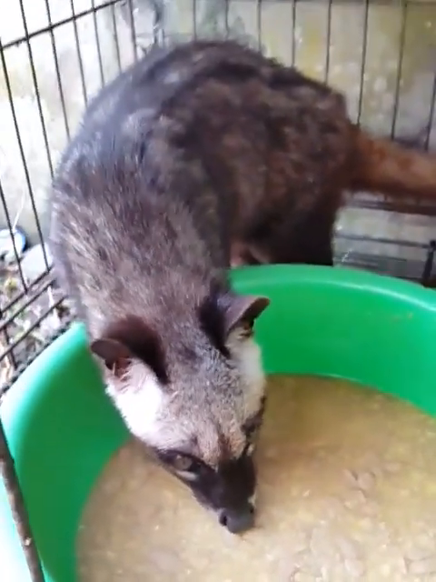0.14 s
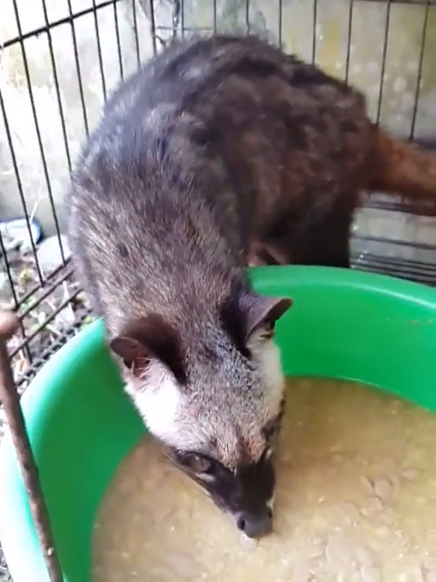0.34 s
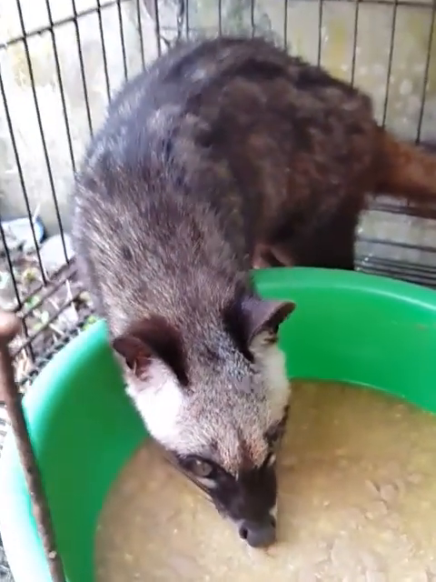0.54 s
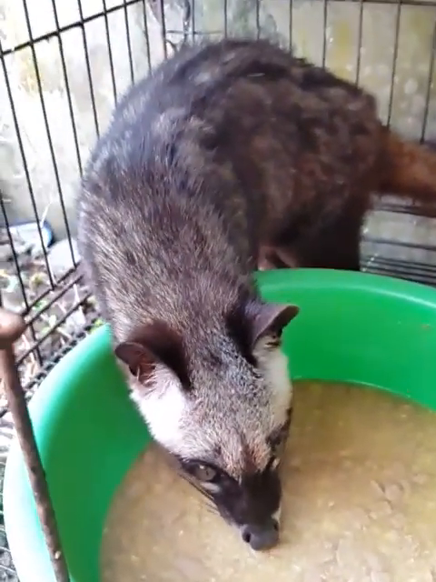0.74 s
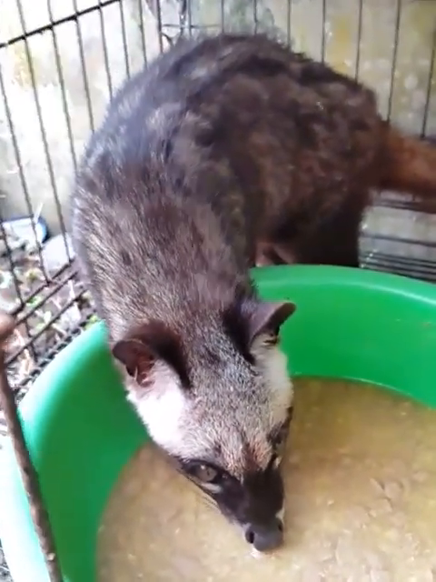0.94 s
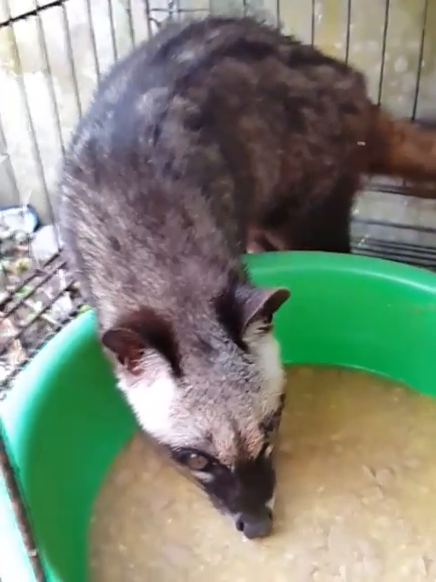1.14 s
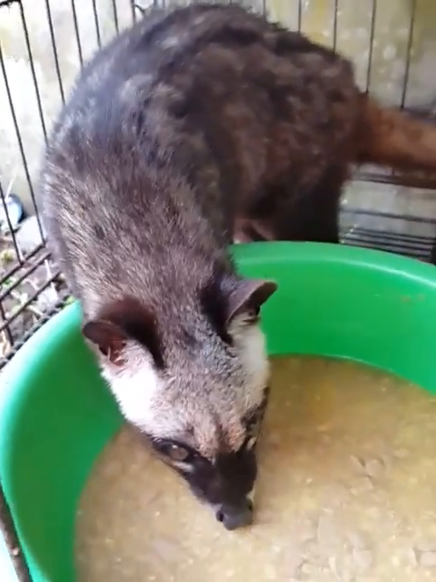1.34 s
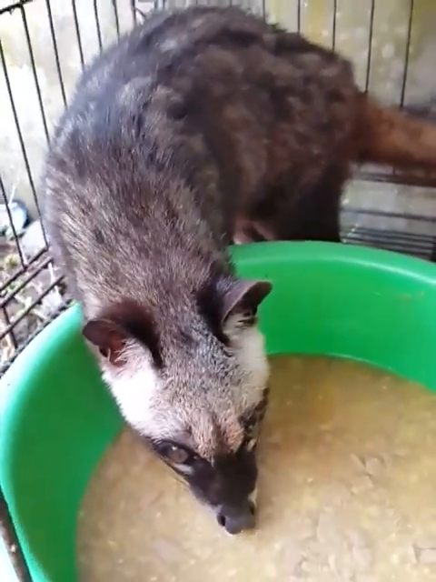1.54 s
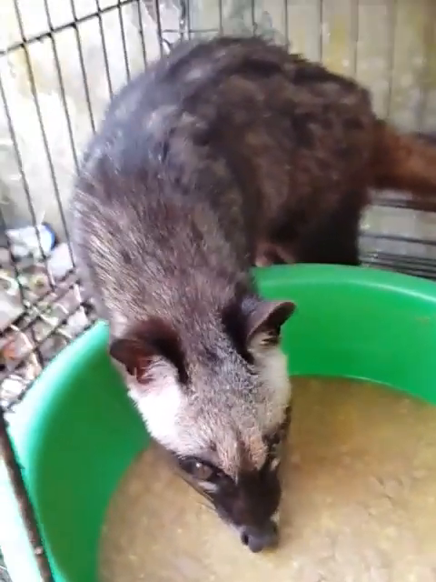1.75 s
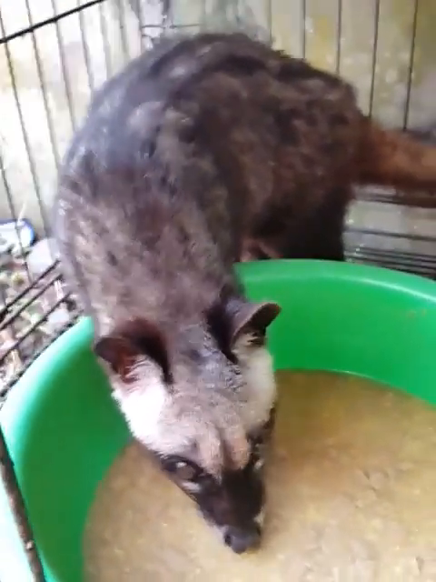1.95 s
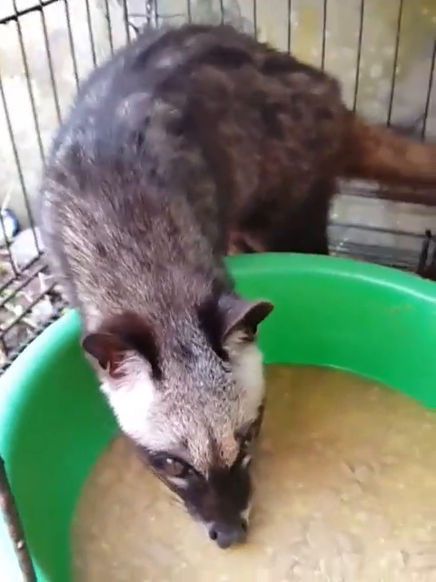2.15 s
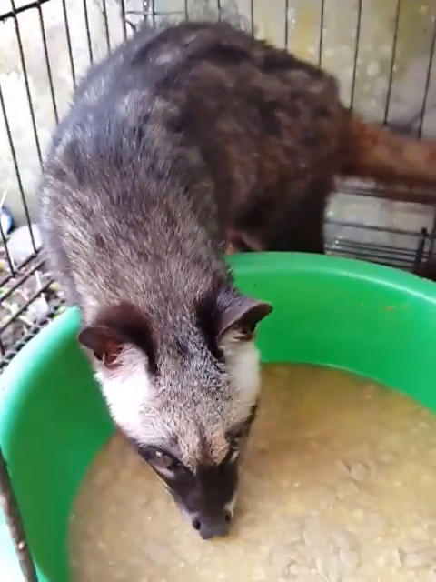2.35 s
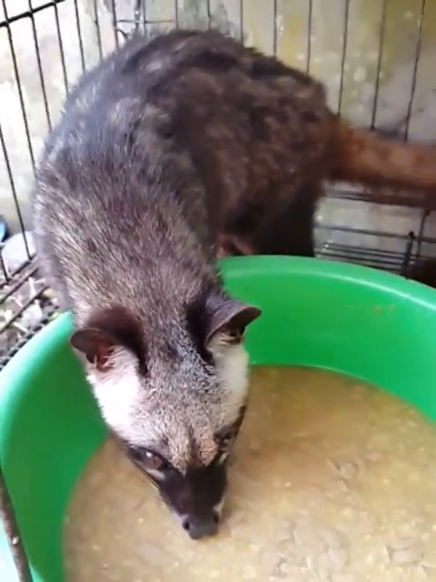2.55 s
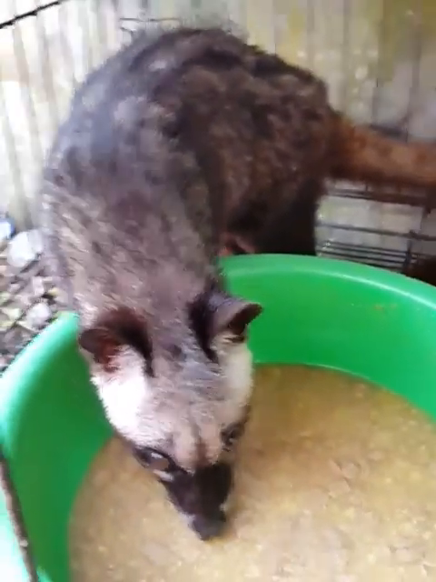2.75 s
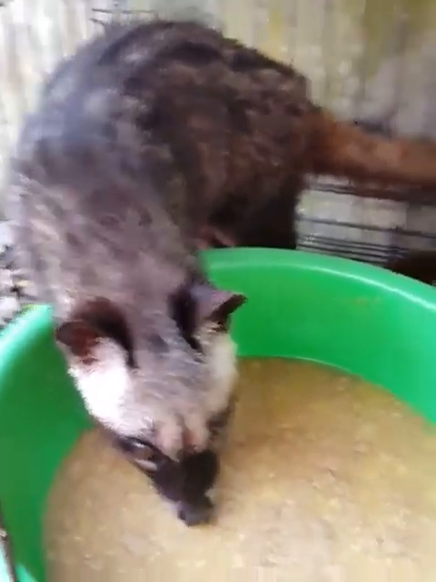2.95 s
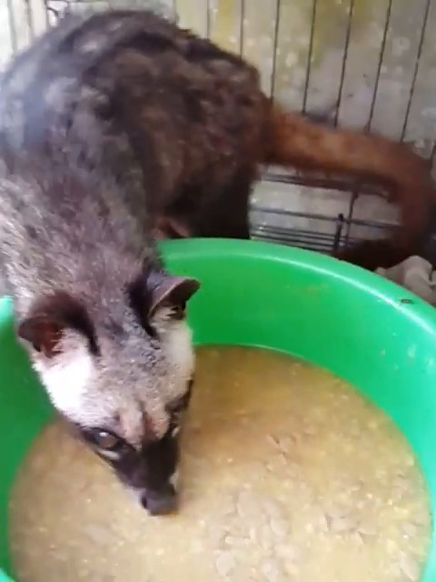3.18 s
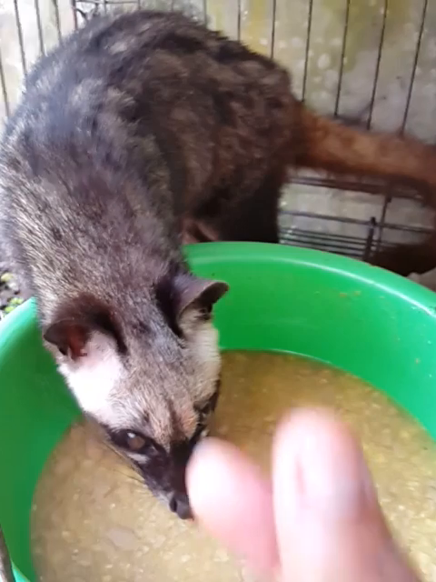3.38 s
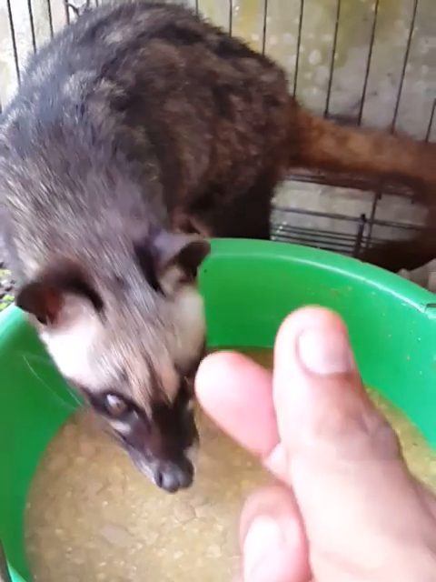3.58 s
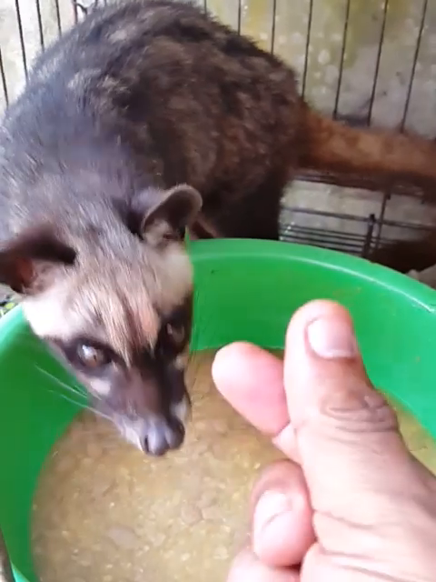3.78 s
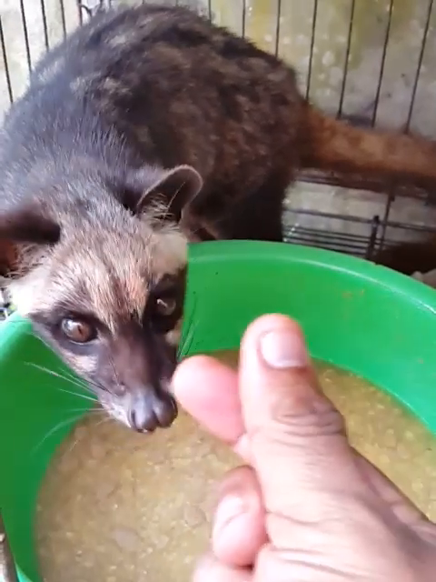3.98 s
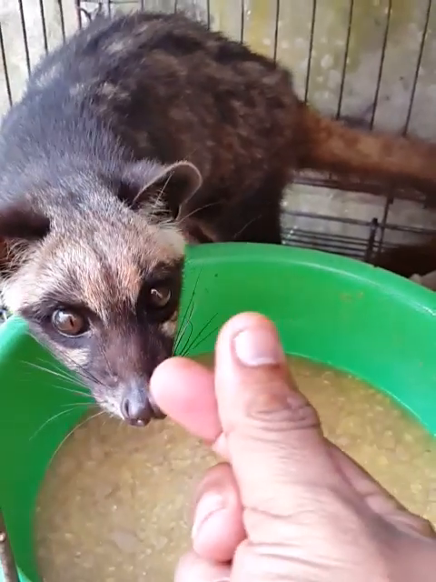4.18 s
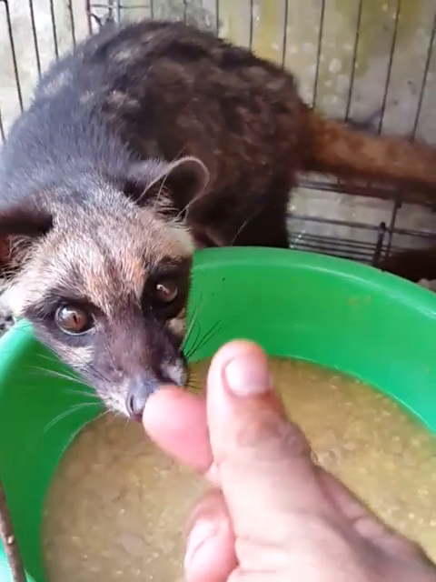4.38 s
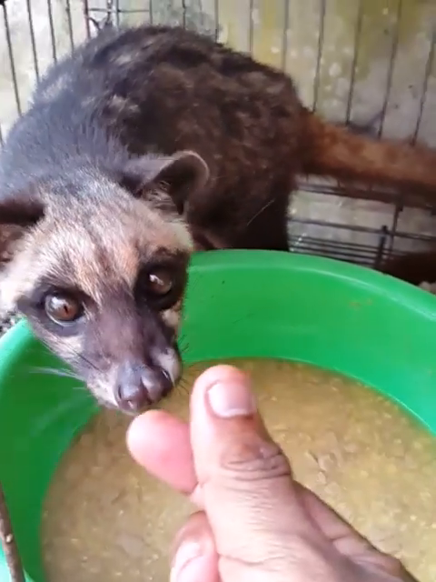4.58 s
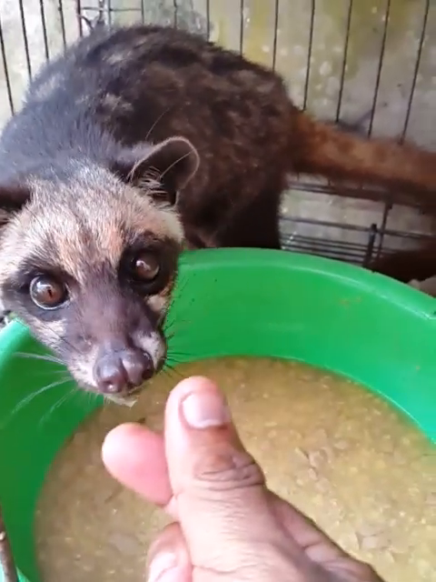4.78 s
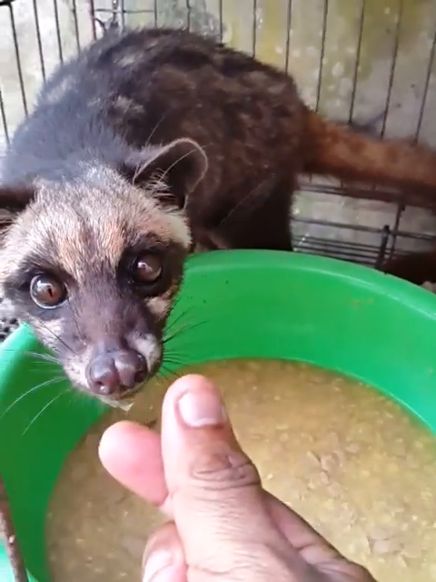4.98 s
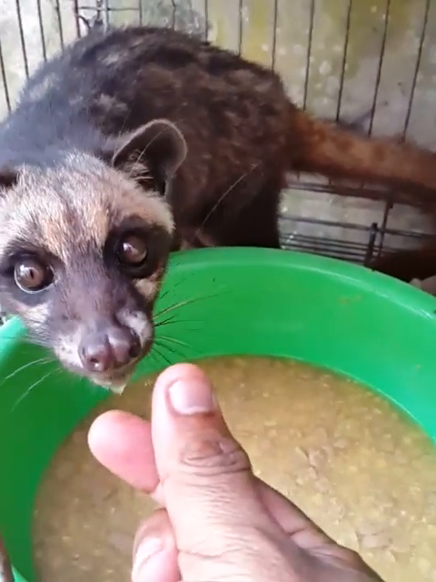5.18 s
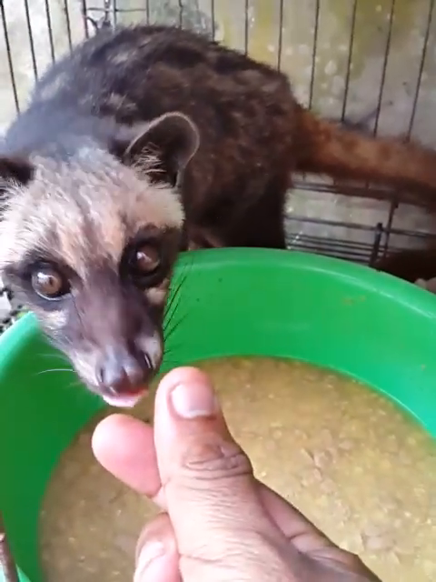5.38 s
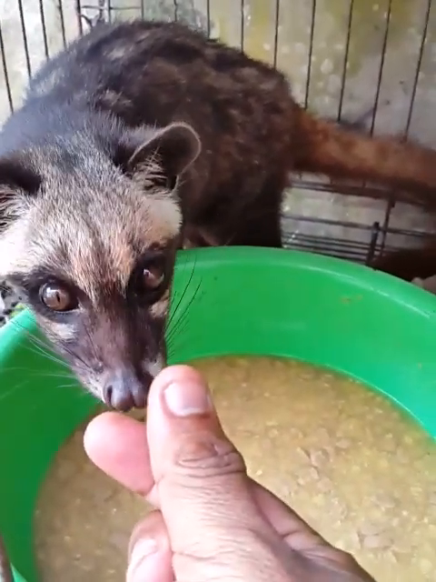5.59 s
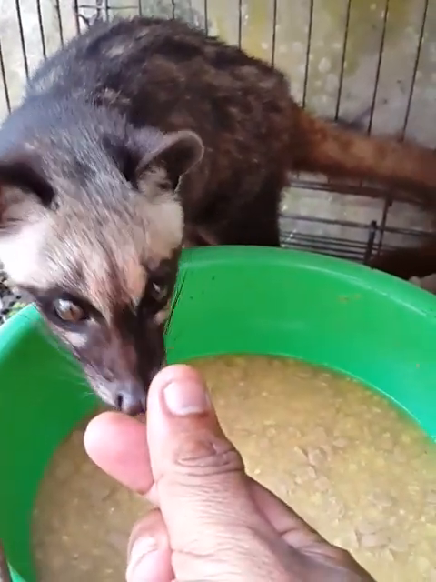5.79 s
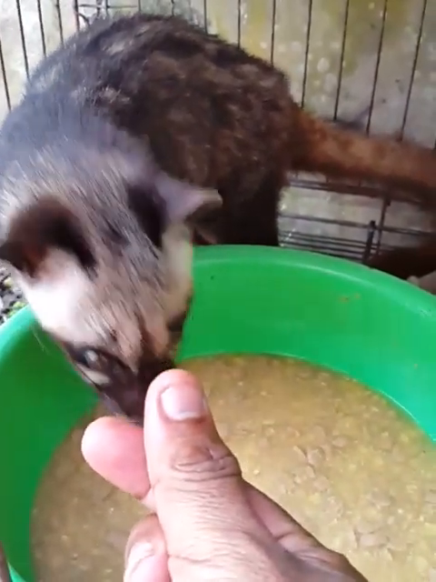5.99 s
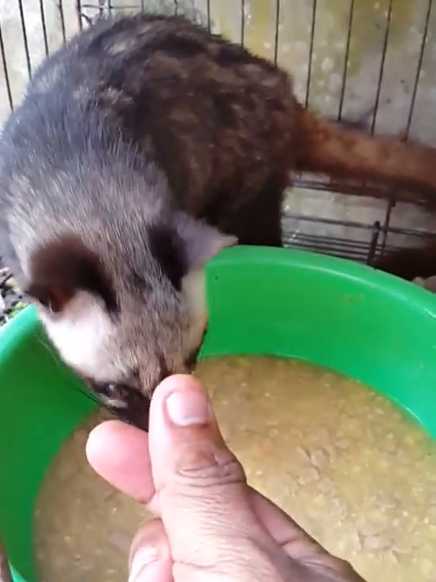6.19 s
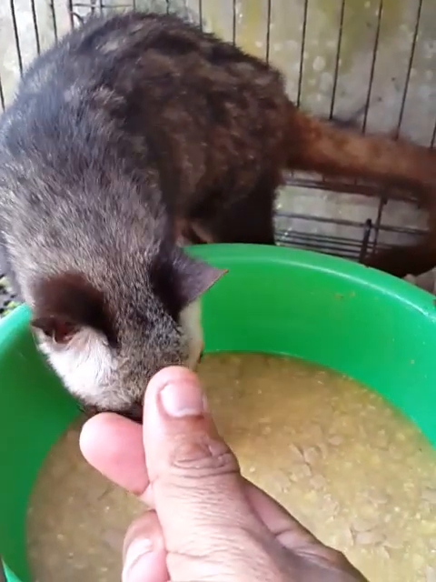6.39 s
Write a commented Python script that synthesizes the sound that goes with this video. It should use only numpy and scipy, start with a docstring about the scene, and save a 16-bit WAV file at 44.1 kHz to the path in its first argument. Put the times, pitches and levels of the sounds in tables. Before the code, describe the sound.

Close, muffled handling noise from a hand-held recorder beside a caged animal's food basin. Low thuds with brief hollow rattles tumble in irregularly, joined by gritty finger rubs and unsteady low rumble. They are heaviest around the middle, then thin into separate knocks and lighter late rubs. Faint hiss and a thin whine, stronger on the right, slowly fade beneath.

```python
"""Handling noise of a hand-held recorder with muffled ports, held beside a caged animal's feeding basin.
Bumps and finger rubs come thick at first, are strongest around the middle, then thin out, with more rubs late.
A bump is a gliding low thud, almost opposite in the two capsules, plus a short rattle of ringing shell modes.
A rub is gritty noise driven through those modes; a few bumps leave one or more notes of the shell ringing.
Hand tremor, a whine of noise bands mostly on the right and circuit hiss lie beneath; whine and hiss fade slowly."""
import sys
import numpy as np
from scipy import signal
from scipy.fft import rfft, irfft, next_fast_len
from scipy.io import wavfile
from scipy.ndimage import uniform_filter1d

SR = 44100
rng = np.random.default_rng(int(sys.argv[2]) if len(sys.argv) > 2 else 0)


def dump(signal):
    """Clip the signal to [-1, 1] and save it as 16-bit WAV at the path in sys.argv[1]."""
    limited = np.clip(np.atleast_2d(signal).T, -1, 1)
    pcm = np.round(limited * 32767).astype(np.int16)
    wavfile.write(sys.argv[1], SR, pcm)


N = 283563
T = np.arange(N) / SR

# The grip over time. Each row: time in seconds, tremor level in dB, rub level in dB.
GRIP = [(0.038, -30, -57), (0.15, -31, -82), (0.54, -32.5, -76.5), (0.82, -29.5, -55), (1.199, -32, -53.5),
        (1.691, -26.5, -49.5), (1.849, -18, -51), (1.98, -27.5, -48), (2.359, -30, -46.5),
        (2.47, -25.5, -61), (2.569, -19.5, -55.5), (2.78, -35, -65.5), (2.95, -42.5, -63), (3.2, -42, -59),
        (3.44, -40.5, -83.5), (3.599, -41.5, -60), (3.97, -42, -91), (4.92, -45.5, -93), (5.7, -43, -82),
        (6.18, -45, -69), (6.43, -46, -75.5)]
# Ringing modes of the thick shell. Each row: pitch in Hz, 60 dB decay in seconds, relative left and right in dB.
SHELL_MODES = [(260, 0.035, 8, 7), (283, 0.023, 1.5, -2), (464.4, 0.022, -1.5, 2),
               (558.2, 0.037, -28.5, 0.5), (695, 0.02, -18, 0), (802, 0.024, -0.5, 2.5),
               (989, 0.02, -5.5, -1), (1094, 0.023, -22.5, -5), (1283, 0.023, -11.5, 0),
               (1408, 0.022, -26.5, -1.5)]
# Ringing modes of the thin parts. Each row: pitch in Hz, 60 dB decay in seconds, relative left and right in dB.
THIN_MODES = [(1516, 0.013, -11, 9.5), (1852, 0.0068, -20.5, 14), (1823, 0.011, 2.5, 4),
              (2176, 0.0067, -0.5, 11.5), (2300, 0.014, -9, -13.5), (2640, 0.013, -29.5, 4.5),
              (2740, 0.042, -17.5, -9), (3595, 0.026, -29, -2), (4010, 0.0083, -43, -2),
              (4700, .012, -23, -18), (5193, 0.0077, -35, -6.5), (5600, 0.0094, -40.5, -24)]


def undb(db):
    """Decibels to an amplitude factor."""
    return 10 ** (np.asarray(db) / 20)


def unit(x):
    """Scale to an RMS of 1."""
    return x / np.sqrt(np.mean(x ** 2))


def decay(t, t60, power=1):
    """Fade that has lost 60 dB at t60; a power above 1 holds longer and then drops faster."""
    return np.exp(-np.log(1000) * (t / t60) ** power)


def ring(x, hz, t60):
    """One decaying mode, scaled so that unit white noise comes out at unit level."""
    radius = np.exp(-np.log(1000) / (t60 * SR))
    w = 2 * np.pi * hz / SR
    gain = 2 * np.sin(w) * np.sqrt(1 - radius)
    return signal.lfilter([gain], [1, -2 * radius * np.cos(w), radius * radius], x)


def band(hz, width):
    """Unit noise through the same resonance twice."""
    b, a = signal.iirpeak(hz, hz / width, SR)
    once = signal.lfilter(b, a, rng.standard_normal(N))
    return unit(signal.lfilter(b, a, once))


def colour(x, points):
    """Shape a spectrum by (Hz, dB) points without delay."""
    hz, db = np.transpose(points)
    size = next_fast_len(N)
    f = np.maximum(np.arange(size // 2 + 1) * SR / size, 1)
    gain = undb(np.interp(np.log(f), np.log(hz), db))
    return irfft(rfft(x, size) * gain, size)[..., :N]


def walk(rate):
    """Random levels held 1 / rate seconds and slewed twice, scaled to an RMS of 1."""
    k = int(SR / rate)
    steps = np.repeat(rng.standard_normal(N // k + 1), k)
    return unit(uniform_filter1d(uniform_filter1d(steps, k), k)[:N])


def thud_of(t, touch, db, hz, t60, pan_db, sway_db, draw):
    """One blow sets off a sagging thud, a bending mode and the body's rocking, lagging at the left capsule."""
    glide, glide_s = 0.28, 0.0062  # the pitch starts 28 % sharp and sags as the contact lets go
    sway_hz, sway_t60_s = 62, .15  # the whole body rocking in the hand
    bend_hz, bend_t60_s = 199, 0.071
    bend_db = np.array([[-7], [-20.5]])  # left, right, relative to the thud
    lag = np.array([[2.495 + 0.62 * draw[0]], [0]])  # radians; the far capsule swings late
    swell = touch * decay(t, max(t60, .03), power=1.26)
    phase = 2 * np.pi * hz * (t + glide * glide_s * (1 - np.exp(-t / glide_s)))
    thud = undb(db) * swell / swell.max() * np.sin(phase - lag)
    bend_phase = 2 * np.pi * bend_hz * (1 + 0.18 * draw[1]) * t
    bend = touch * decay(t, bend_t60_s) * np.sin(bend_phase - 1.735 * lag)
    sway_phase = 2 * np.pi * sway_hz * (1 + 0.069 * draw[2]) * t
    sway = touch * decay(t, sway_t60_s) * np.sin(sway_phase - lag)
    return undb([[pan_db], [0]]) * (undb(sway_db) * sway - thud) + undb(db + bend_db) * bend


def bumps():
    """Taps and presses: thuds (left, right), then chatter and clean knocks that drive each shell and thin mode."""
    # Taps and presses on the casing. Each row: start in seconds, thud level in dB at the right before the
    # added modes, settled thud pitch in Hz, low and high rattle in dB relative to the thud,
    # thud 60 dB decay in seconds (used from 0.03 up), contact in milliseconds (used from 0.3 up as rise).
    blows = [(0.1, -9, 142.8, 0, -11, 0.082, 3.2), (0.294, -23.5, 130.7, -4, -15, 0.13, 1.8),
             (0.455, -18.5, 140.1, -4.5, -19.5, 0.15, 0.89), (0.553, -29, 143.7, -1, -28.5, 0.14, 1.9),
             (0.643, -18, 84.5, -9, -43.5, 0.17, 7.1), (0.697, -21.5, 145.7, -6, -25.5, 0.18, 2.1),
             (0.8, -22.5, 131.2, -15.5, -18, 0.063, 3), (0.862, -21, 112.4, -9, -17, 0.15, 1.3),
             (0.965, -25.5, 151, 2, -4, 0.52, 2.1), (1.058, -16.5, 84.8, -2.5, -18, 0.059, 25),
             (1.089, -15, 96.6, -6.5, -14, 0.12, 2.2), (1.174, -23.5, 124.6, -11.5, -22, 0.19, 2.6),
             (1.246, -18.5, 84, -11.5, -11.5, 0.031, 14), (1.373, -22.5, 118.4, -4, -30.5, 0.086, 4.6),
             (1.492, -20, 131.3, 1, -35, 0.048, 9), (1.624, -9.5, 117.3, -32.5, -45, 0.19, 4.6),
             (1.778, -15.5, 145.4, -2, -21, 0.3, 0.91), (1.856, -15.5, 126.4, -7, -20.5, 0.16, 2.2),
             (1.915, -18, 96.4, -3.5, -3.5, 0.055, 1.4), (2.003, -13.5, 117.2, -19, -3, 0.085, 13),
             (2.084, -14.5, 142.7, -6.5, -16, 0.16, 2), (2.252, -11.5, 121.4, -26.5, -8.5, 0.075, 7.6),
             (2.425, -2.5, 131.2, -15.5, -25.5, 0.064, 1.2), (2.482, -21.5, 125.3, -1.5, -18.5, 0.094, 1.6),
             (2.518, -2.5, 114.9, -13.5, -17.5, 0.16, 5.5), (2.572, -1.5, 138.6, -25, -20.5, 0.014, 1.5),
             (2.627, -3.5, 143.6, -13, -23, 0.086, 1.2), (2.647, -6.5, 190, -13, -22, 0.17, 1.2),
             (2.675, -4.5, 125.4, -21.5, -18, 0.11, 2.5), (2.851, -1.5, 126.7, -10, -18.5, 0.12, 2.6),
             (2.919, -21, 145.7, -13, -4, 0.094, 2.4), (2.978, -33.5, 104, -2, -2.5, 0.11, 0.99),
             (3.013, -39, 86.2, -41, 27.5, 0.073, 3.2), (3.107, -4.5, 114.6, -18, -18, 0.081, 2.9),
             (3.287, -33.5, 132, -11.5, -21, 0.045, 1.8), (3.375, -25.5, 158, -9.5, -15, 0.14, 2.8),
             (3.44, -25.5, 148.7, -7.5, -8, 0.1, 2.2), (3.557, -1.5, 162.6, -16, -24, 0.071, 2.2),
             (3.677, -9, 142.6, -3.5, -3, 0.023, 2), (3.838, -19, 111.4, -6.5, -13.5, 0.043, 1.6),
             (3.933, -35, 136, -7, -15.5, 0.035, 2.3), (4.022, -31, 111.8, -3.5, -38, 0.061, 1.6),
             (4.191, -13.5, 175.3, -11.5, -17.5, 0.064, 1.3), (4.208, -16, 100.4, -10.5, -27, 0.15, 7.8),
             (4.236, -20, 174, -8.5, -13, 0.096, 1.6), (4.587, -47, 105.5, 8, 5, 0.072, 8.5),
             (4.84, -33.5, 111, -10.5, -14, 0.096, 4), (5.107, -16.5, 112.4, -7.5, -21.5, 0.091, 3),
             (5.278, -35, 105.3, -32, -14, 0.029, 5.6), (5.544, -16.5, 111.4, -8, -6.5, 0.063, 17),
             (5.677, -8, 112.8, -10, -17.5, 0.052, 6.4), (5.749, -23.5, 124, -11.5, -14.5, 0.1, 8.8),
             (5.863, -20.5, 123.3, -10, -8, 0.081, 7.4), (6.096, -17, 130, -4, -17.5, 0.047, 11),
             (6.122, -30.5, 125.8, -4.5, -9, 0.19, 5.9), (6.168, -26, 146.2, -14, -20, 0.17, 5.3),
             (6.201, -31.5, 111.3, -23, -16, 0.071, 7.6), (6.302, -27.5, 124.5, -46, -16, 0.033, 13)]
    # Balance as the hold shifts. Each row: time in seconds, left minus right in dB before the left bass tilt.
    thud_pan = [(0, -6.5), (2.87, -6.5), (2.95, -3.5), (5.3, -1.5), (5.5, -8.5), (6.4, -8.5)]
    tail_gain, tail_share, longest_s, tail_power = 0.34, 0.21, 0.096, 1.29  # chatter after each contact
    knock_gain, hard_ms, spread_ms = 12.3, 5.87, 1.2
    thud = np.zeros((2, N + SR))
    rattle = np.zeros((2, len(SHELL_MODES), N + SR))  # chatter, knocks
    tick = np.zeros((2, len(THIN_MODES), N + SR))
    t = np.arange(SR // 4) / SR
    grip_s, grip_tremor_db, _ = np.transpose(GRIP)
    shell_oct = np.log2(np.array(SHELL_MODES)[:, 0])
    thin_oct = np.log2(np.array(THIN_MODES)[:, 0] / 1900)
    # a fingertip is too soft to strike the highest modes
    thin_knock = undb(2.5 - 2 * np.maximum(thin_oct, 0))
    chance = rng.standard_normal((len(blows), 3 + len(SHELL_MODES) + len(THIN_MODES)))
    for (s, db, hz, low_db, high_db, t60, ms), draw in zip(blows, chance):
        i = int(s * SR)
        rise = max(ms, .3) / 1000
        touch = 1 - np.exp(-(t / rise) ** 2)
        pan_db = np.interp(s, *np.transpose(thud_pan))
        # the rocking grows with the blow and with an unsteady hold
        sway_db = 3 + .4 * db + 0.48 * np.interp(s, grip_s, grip_tremor_db)
        thud[:, i:i + len(t)] += thud_of(t, touch, db, hz, t60, pan_db, sway_db, draw)

        tail_s = tail_share * np.clip(t60, .04, longest_s)
        chatter = tail_gain * touch * np.exp(-(t / tail_s) ** tail_power)
        # the place and hardness of the blow tilt the force across the modes
        shell_share = undb(db + np.interp(shell_oct, np.log2([480, 1100]), [low_db, high_db]))
        # softer contacts reach the thin parts less, and higher modes get less per octave
        tick_db = high_db - 17.5 - 0.46 * ms
        thin_share = undb(db + tick_db - 16.5 * thin_oct)
        shell_draw, thin_draw = np.split(draw[3:], [len(SHELL_MODES)])
        # only a short contact strikes cleanly
        hardness = knock_gain * np.exp(-(ms / hard_ms) ** 2)
        for force, share, boost, luck in ((rattle, shell_share, 1, shell_draw),
                                          (tick, thin_share, thin_knock, thin_draw)):
            force[0, :, i:i + len(t)] += share[:, None] * chatter
            # the knock reaches each mode at a slightly different moment
            delay = (spread_ms * SR / 1000 * np.abs(luck)).astype(int)
            reach = i + int(rise * SR / 2) + delay
            force[1, np.arange(len(share)), reach] += share * boost * hardness * np.sign(luck)
    # the pad of the finger spreads each knock on the thin parts over half a millisecond
    tick[1] = uniform_filter1d(uniform_filter1d(tick[1], size=13), size=11)
    return thud[:, :N], rattle[..., :N], tick[..., :N]


def shell(force, knocks, modes, reach):
    """A gritty force and clean knocks ring the modes; the capsules sit on opposite sides of some bends."""
    shared, patchy_db = .65, 1.5  # share of grit power common to both sides; spread of each mode's level
    grit = rng.standard_normal((3, N))
    grit = np.sqrt(shared) * grit[0] + np.sqrt(1 - shared) * grit[1:]
    out = 0
    for k, (hz, t60, left_db, right_db) in enumerate(modes):
        signs = [[-1], [(-1) ** (k // 2)]]
        sides = undb([[left_db], [right_db]]) * signs
        drive = (grit * force[k] + knocks[k]) * undb(patchy_db * walk(9))
        out = out + sides * ring(drive, hz, t60)
    return colour(out / np.sqrt(len(modes)), reach)


def notes():
    """A few bumps leave one or more notes of the shell ringing: decaying sines, weaker and reversed at the left."""
    # Each row: start in seconds, pitch in Hz, right level in dB before rise and decay, 60 dB decay in seconds.
    lingering = [(0.103, 580, -30.5, 0.11), (0.297, 584, -40, 0.081), (0.456, 577, -41, .1),
                 (0.965, 583.4, -20, 0.071), (1.093, 584, -36, 0.099), (2.856, 568, -22, 0.11),
                 (3.016, 1423, -23, .07), (3.679, 1001, -21, .063), (3.679, 1784, -34.5, 0.087),
                 (3.68, 817, -32.5, 0.21), (4.846, 565, -40.5, .11)]
    rise_s, left_db = 0.0015, -10
    out = np.zeros(N)
    for s, hz, db, t60 in lingering:
        t = np.maximum(T - s, 0)
        touch = 1 - np.exp(-(t / rise_s) ** 2)
        out += undb(db) * touch * decay(t, t60) * np.sin(2 * np.pi * hz * t)
    return out * np.array([[-undb(left_db)], [1]])


def rubs():
    """Skin slides on the casing: each swells, holds and fades as force on the shell and on its thin parts."""
    # Each row: middle in seconds, length in seconds, rub force in dB, dry scrape force in dB,
    # both forces before the flutter of skin that catches and lets go.
    slides = [(0.686, 0.054, -52.5, -82.5), (0.798, 0.051, -47, -53.5), (1.376, 0.046, -52.5, -62.5),
              (1.495, 0.086, -57, -65), (1.621, 0.053, -44, -60), (1.819, 0.086, -47.5, -59),
              (1.941, 0.031, -60.5, -69), (2.002, .07, -41.5, -54), (2.33, 0.2, -49.5, -52),
              (2.439, 0.033, -44, -56.5), (2.527, 0.078, -51.5, -61), (2.585, 0.048, -39, -58.5),
              (2.664, 0.11, -38.5, -58.5), (5.564, 0.028, -53.5, -90), (5.766, 0.054, -51.5, -84),
              (5.863, 0.055, -53, -96.5), (6.105, 0.06, -51, -94), (6.186, .055, -52.5, -96)]
    force = np.zeros((2, N))
    for s, length, rub_db, scrape_db in slides:
        swell = np.exp(-(2 * (T - s) / length) ** 4)
        force += undb([[rub_db], [scrape_db]]) * swell
    return force


def tremor(db):
    """The hand's unsteady hold shakes the low modes of the casing, the capsules in opposite senses."""
    # Low modes of the casing. Each row: centre in Hz, width in Hz, relative level in dB before its flicker.
    low_modes = [(49.4, 23, 3), (68.7, 25, 0), (106.5, 33, 1.5), (139.7, 24, -3), (233, 60, -13.5)]
    flicker_db, own_db, left_db = 5.5, -15, -13  # own: noise that the left alone carries
    right = unit(sum(undb(g + flicker_db * walk(9.1)) * band(hz, width) for hz, width, g in low_modes))
    left = undb(own_db) * band(110, 210) - undb(left_db) * right
    return undb(db) * np.array([left, right])


def whine():
    """Resonant noise bands, independent left and right and stronger on the right, that fade slowly."""
    # Each row: centre in Hz, width in Hz, left and right level in dB before the slow fade.
    bands = [(1110, 94, -86, -73), (1129, 15, -88, -69.5), (1310, 230, -91, -70), (1407, 13, -86, -71),
             (1409, 140, -90.5, -76.5), (3558, 400, -101, -87), (3890, 1200, -102, -86)]
    out = np.zeros((2, N))
    for hz, width, left_db, right_db in bands:
        out += undb([[left_db], [right_db]]) * [band(hz, width), band(hz, width)]
    return out * undb(5 - .5 * T)


def hiss():
    """The capsules' own circuit hiss: separate coloured noise on each side, fading slowly."""
    # Each row: frequency in Hz, noise density in dB per Hz before the slow fade.
    spectrum = [(250, -94), (500, -108), (900, -104), (1700, -115), (2500, -120), (4500, -127),
                (6500, -132), (10500, -132), (13000, -121), (15700, -110)]
    noise = colour(rng.standard_normal((2, N)), spectrum) * np.sqrt(SR / 2)
    return noise * undb(4.5 - 1.1 * T)


def scene():
    """Sum the low shaking, the rattle of thick and thin parts, the lingering notes, the whine and the hiss."""
    # The left capsule's tilt for thuds and tremor. Each row: frequency in Hz, gain in dB.
    left_bass = [(40, -13.5), (100, -4), (130, -4), (170, 2), (215, 4.5), (300, -5)]
    # Reach of the thick shell's rattle. Each row: frequency in Hz, gain in dB.
    thick_reach = [(150, -15), (240, 2), (1450, -3), (1900, -10), (3000, -35), (4500, -62.5)]
    # The covered ports swallow the treble. Each row: frequency in Hz, gain in dB.
    port_reach = [(1000, 0.5), (2400, -5), (3200, -4), (5300, -4.5), (6200, -32), (9000, -49.5)]
    grip_s, *columns = np.transpose(GRIP)
    tremor_db, rub_db = (np.interp(T, grip_s, c) for c in columns)
    thud, rattle, tick = bumps()
    bass = thud + tremor(tremor_db)
    bass[0] = colour(bass[0], left_bass)
    stick = undb(2.3 * walk(110))  # skin catches and lets go
    # the grip's own dry scrape lies 14 dB below its rub
    rub, scrape = stick * (rubs() + undb([rub_db, rub_db - 14]))
    thick = shell(stick * rattle[0] + rub, rattle[1], SHELL_MODES, thick_reach)
    thin = shell(stick * tick[0] + scrape, tick[1], THIN_MODES, port_reach)
    return bass + thick + thin + notes() + whine() + hiss()


def record(dry):
    """The loudest thuds are rounded by a soft ceiling and the top is cut by a steep low-pass."""
    ceiling, top_hz = 1.1, 15780
    rounded = ceiling * np.tanh(dry / ceiling)
    low_pass = signal.ellip(10, .2, 80, top_hz, fs=SR, output="sos")  # 0.2 dB ripple, 80 dB stop band
    return signal.sosfilt(low_pass, rounded)


dry = scene()
out = record(dry)
dump(out)
```